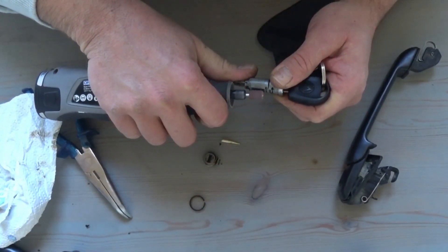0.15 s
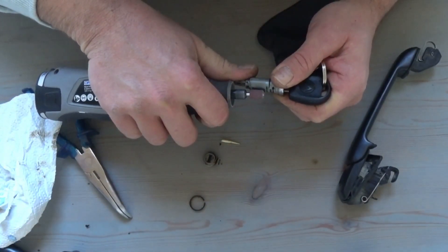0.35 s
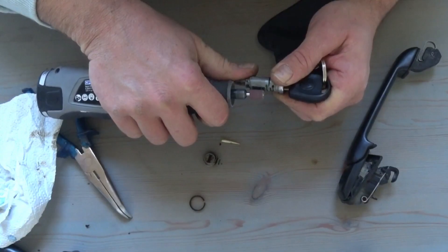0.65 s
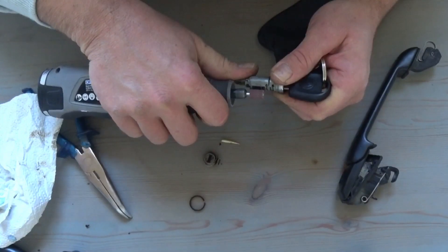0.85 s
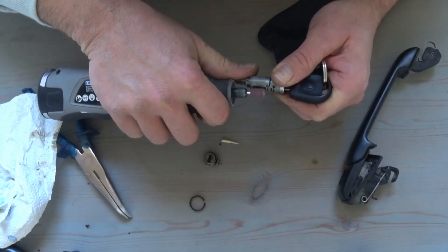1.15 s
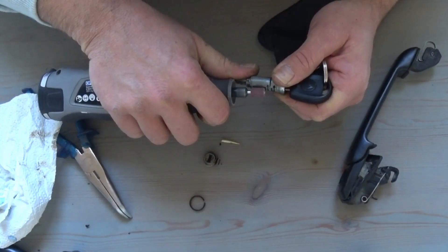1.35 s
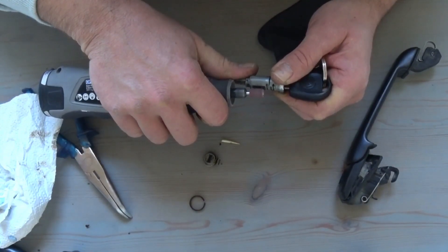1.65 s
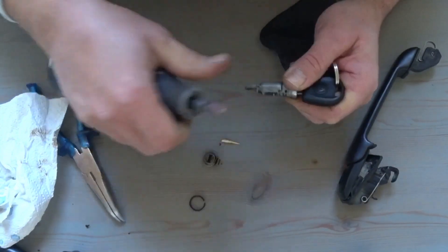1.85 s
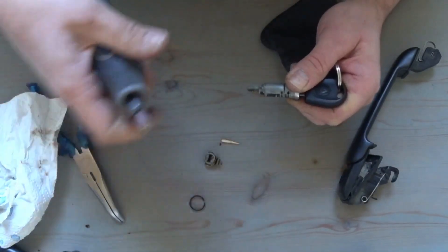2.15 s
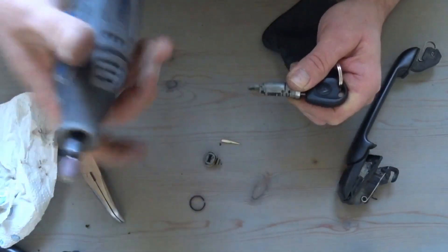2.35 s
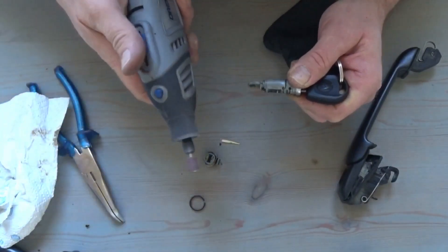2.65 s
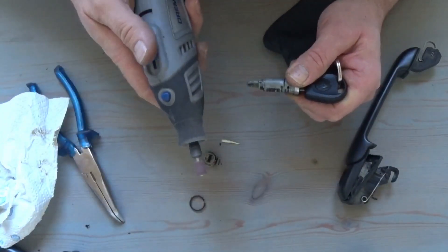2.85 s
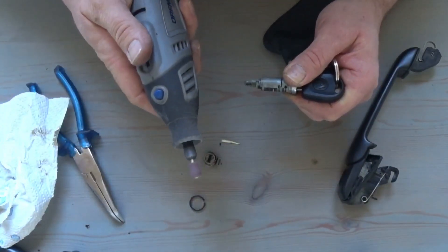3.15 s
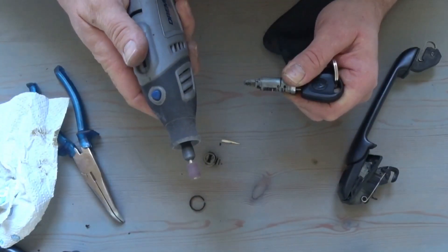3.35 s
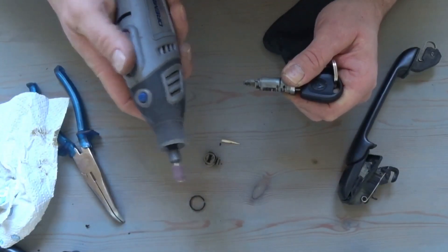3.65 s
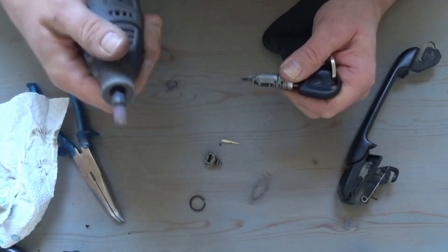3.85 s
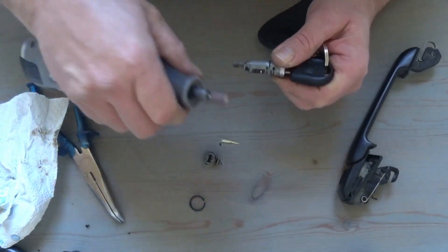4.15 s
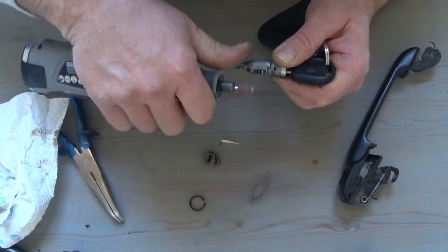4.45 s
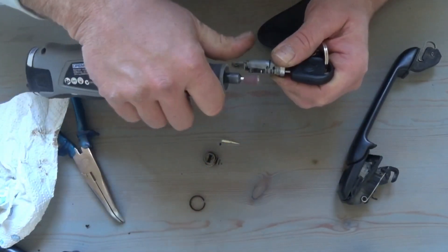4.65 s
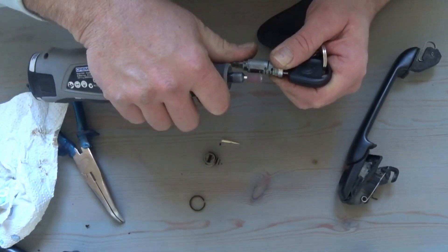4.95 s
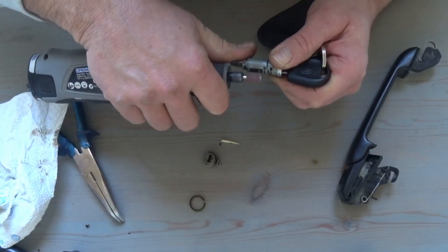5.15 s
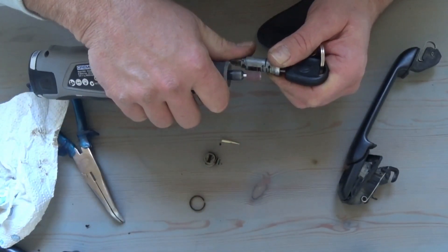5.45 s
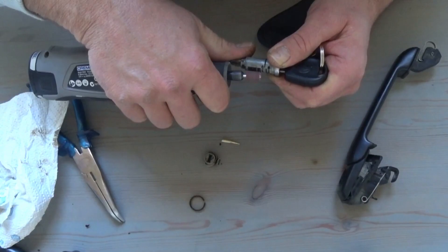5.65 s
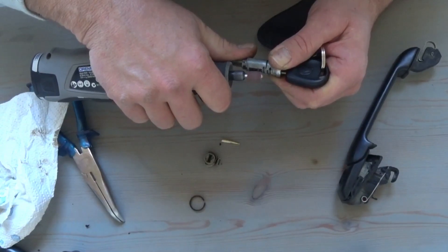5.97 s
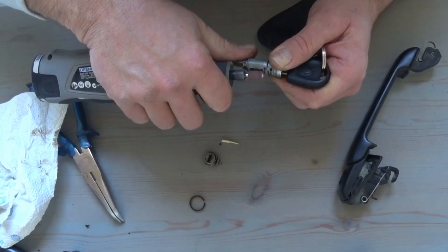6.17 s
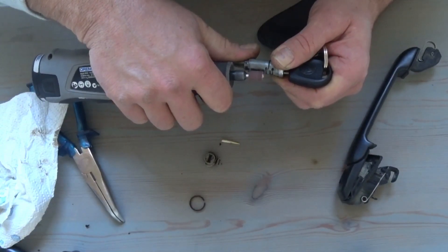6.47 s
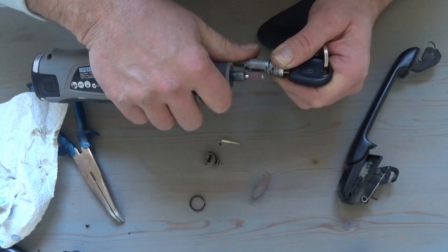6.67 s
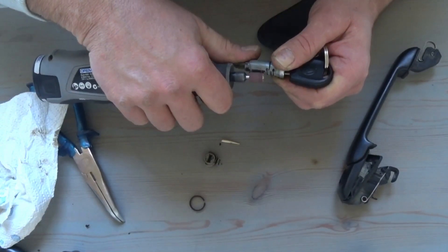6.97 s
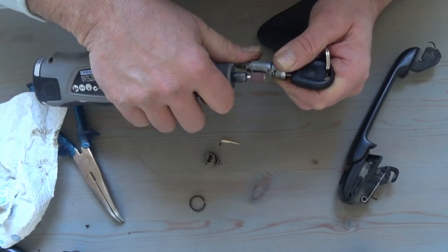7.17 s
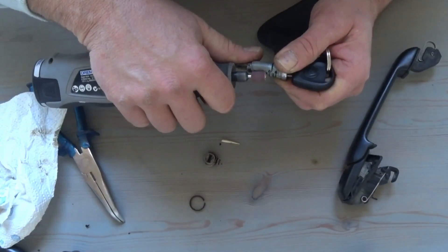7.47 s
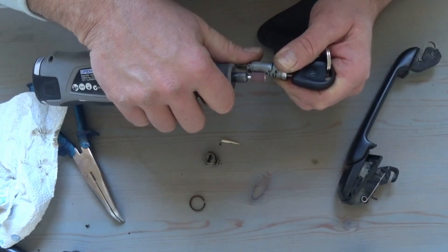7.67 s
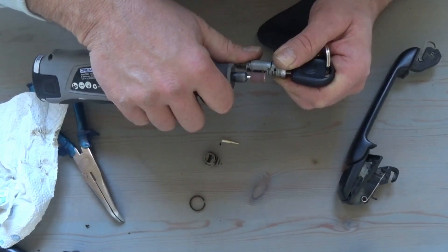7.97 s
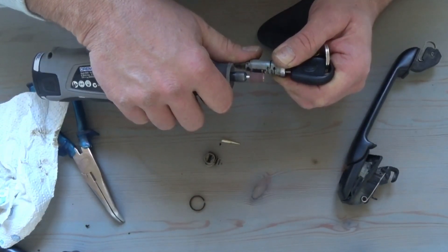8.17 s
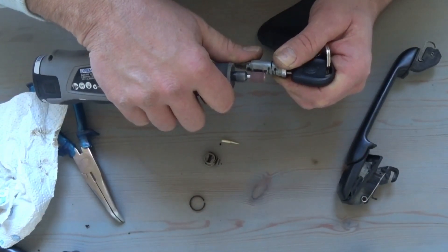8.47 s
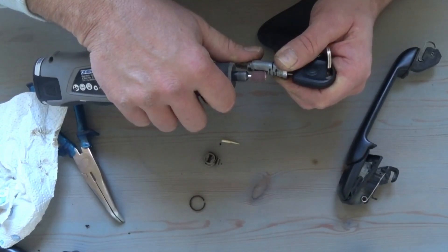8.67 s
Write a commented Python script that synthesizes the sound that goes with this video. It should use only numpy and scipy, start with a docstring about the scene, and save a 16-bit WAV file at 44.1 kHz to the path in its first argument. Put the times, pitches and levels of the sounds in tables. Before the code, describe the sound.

From the start a hand-held rotary tool grinds a small metal lock cylinder: a rough buzzing motor with brush and fan hiss, plus gritty scraping and chatter pulsing with each turn. After a brief easing at 0.3-0.45 s it presses again, the pitch sagging until about 1.5 s. The stone lets go, the motor recovers, and at 1.7-1.8 s a dull cluster of wooden knocks rattles the bench. The free-running buzz changes colour, with sliding resonances, as the tool swings. From 3.0 to 4.0 s it winds up to nearly double the pitch, then holds a bright, hissy whine. At 5.4 s the stone bites again; harsher scraping drags the pitch down by 5.9 s. It rebounds near 6.4 s, sags heavily to 7.3 s, jumps around 7.6 s, then grinds low again until a slight rise at 8.7 s. Close stereo, tool slightly left, short reflections and faint low room tone.

```python
"""A stone is heard grinding a small lock cylinder at once, its hand-held rotary tool slowing under the drag.
It is lifted off with a dull knock on the wooden bench, turned up to a higher speed, and bites again.
The motor is a repeating pattern of rotor lines plus brush and fan hiss, both following the shaft.
Grit scrapes most strongly once a turn and the bouncing stone chatters; both ring the lock.
Resonances flare and slide as the tool is swung about; a faint low room tone lies underneath."""
import sys
import numpy as np
from scipy import signal
from scipy.fft import rfft, irfft, next_fast_len
from scipy.io import wavfile
from scipy.ndimage import uniform_filter1d

SR = 44100
rng = np.random.default_rng(int(sys.argv[2]) if len(sys.argv) > 2 else 0)


def log_audio(samples):
    """Write samples as a 16-bit WAV file to the path given in sys.argv[1]."""
    # one column per channel
    frames = np.atleast_2d(samples).T
    # limit to full scale, then quantise
    limited = np.clip(frames, -1, 1)
    pcm = np.round(limited * 32767).astype(np.int16)
    wavfile.write(sys.argv[1], SR, pcm)


N = 388521
T = np.arange(N) / SR  # time of every sample, s

# Shaft speed before inertia smooths it: t/s, speed/Hz (turns per second)
SHAFT_SPEED = [(0.0, 85.5), (0.12, 75.5), (0.38, 70.0), (0.5, 70.25), (0.68, 64.75), (1.34, 54.75),
               (1.54, 56.75), (1.8, 79.75), (1.95, 85.5), (2.17, 86.5), (2.5, 88.5), (3.04, 90.0),
               (3.3, 124.0), (3.5, 140.5), (3.82, 153.25), (4.45, 157.3), (5.0, 155.5), (5.39, 156.2),
               (5.51, 146.0), (5.6, 131.7), (5.72, 110.2), (5.78, 105.8), (5.92, 103.0), (6.21, 107.9),
               (6.41, 130.7), (6.52, 127.5), (6.575, 121.8), (6.67, 99.7), (6.74, 96.0), (6.83, 87.0),
               (7.25, 83.5), (7.45, 112.0), (7.66, 122.0), (7.85, 102.5), (8.2, 82.5), (8.5, 80.5),
               (8.72, 97.25), (8.81, 97.75)]
# Strong multiples of the shaft speed: order, level/dB over the other orders on the slow setting, on the fast one
STRONG_ORDERS = [(1, 5, 6), (3, 3, 7), (4, 0, 10.5), (5, -5, -2), (6, 10.5, 12), (7, -4, 5.5), (8, 0, 9.5),
                 (9, 10.5, 13), (11, -1, -3), (12, 11, 11), (14, 6.5, 10), (15, 11, 2), (16, 11, 10),
                 (17, 2, 1.5), (18, 11.5, -1), (20, 11, 0), (22, 5, 7.5), (24, 1, 2), (25, 0, -6),
                 (27, 7, -6), (28, 1, 3)]
# Tone colour of the motor housing: f/Hz, level/dB
HOUSING_COLOUR = [(76, -68), (130, -23), (418, -20.5), (459, -15), (618, -14.5), (665, -12.5), (912, -4),
                  (1020, -7), (1270, -3.5), (1510, -7.5), (2480, -0.5), (4500, -4), (6170, -14.5),
                  (7560, -19.5), (11000, -23.5), (14200, -57), (22000, -120)]
# Tone colours of the scraped metal, slow setting then fast: f/Hz, level/dB
METAL_COLOURS = [
    [(76, -26), (130, -25), (273, -23.5), (335, -14.5), (653, -10), (816, -4.5), (1120, -8.5), (1370, -3),
     (2390, -20.5), (3100, -12), (3530, -17), (4000, -12), (4700, -14), (6280, -10.5), (7560, -0.5),
     (8940, -10), (11000, -5), (14200, -50), (22000, -120)],
    [(76, -50), (130, -21), (278, -22), (335, -13), (418, -14.5), (523, -10.5), (1120, -3), (1370, 2),
     (1710, -5.5), (2940, -5), (3740, -7.5), (7420, -8), (8940, -15), (10200, -10), (11000, -15),
     (14200, -64), (22000, -120)],
]
# Tone colour of the low rumble in the room: f/Hz, relative level/dB
ROOM_COLOUR = [(20, -6), (50, -1.5), (100, -4.5), (200, -10.5), (400, -13.5), (2000, -85)]
# Strength of the reflections that differ between the sides: f/Hz, level/dB
REFLECTION_COLOUR = [(100, -2), (280, 5.5), (600, -12), (1100, -10), (2200, -10), (3300, -14), (5500, -52),
                     (11000, -68)]
# How much louder the left side is than the right, before reflections: f/Hz, level/dB
LEFT_OVER_RIGHT = [(190, 0.5), (340, 2.9), (600, 1.1), (1060, 2.8), (1900, 4.2), (3300, 0.5), (5900, 0.65)]
# Resonances of tool and lock pressed together: f/Hz, width/Hz, level/dB
LOCK_MODES = [(151.5, 12, 8), (330, 25, -4.5), (402, 40, -4), (515.6, 22.6, 8), (580, 31, 3), (717, 48, 0),
              (823, 74, 4), (948, 21, 2), (1047, 18, 2), (1194, 22, 5), (1256, 35, -1), (1360, 15, 4),
              (1460, 28, -1.5), (1610, 19, 1.5), (2207, 170, -0.5), (2500, 270, -5.5), (2750, 120, -9.5),
              (2890, 36, 0), (2988, 30, 1.5), (3330, 220, -3.5), (4050, 230, -5.5), (4370, 170, -7),
              (5600, 490, -15.5), (7660, 710, -11), (9860, 870, -2.5)]
# Knocks through the bench: t/s, time for which the push is above a fifth of its peak/ms,
# boom level/dB, sideways rocking level/dB
BENCH_KNOCKS = [(1.6759, 1, -24, -10), (1.6838, 2.2, -16.5, -2), (1.7035, 1.8, -28, -28),
                (1.7171, 2.2, -25.5, -8), (1.7315, 2.7, -31, -30), (1.744, 3.8, -24, -18),
                (1.7673, 2.7, -39, -22), (1.8038, 1.4, -41, -6), (1.8116, 1.3, -29.5, -16),
                (1.8178, 3.6, -24, -16)]
# Resonances that flare as the tool turns in the hand: t/s, time from peak to 37 %/s, f/Hz,
# glide/octaves per s, width/Hz, peak level/dB
TOOL_FLARES = [(1.873, 0.045, 1490, 0.3, 60, 8), (1.958, 0.027, 2780, 0, 510, 10),
               (2.137, 0.075, 513, 0.27, 46, 18), (2.17, 0.027, 3150, -1, 350, 9.5),
               (2.223, 0.024, 7100, 0, 800, 9), (2.254, 0.076, 4660, -0.61, 360, 11.5),
               (2.27, 0.06, 5700, 0.8, 700, 7), (2.294, 0.055, 2270, -1, 200, 10.5),
               (2.7, 0.065, 2240, 0.48, 110, 16), (2.723, 0.11, 4250, -0.5, 350, 8),
               (2.867, 0.23, 1360, -0.024, 60, 6.5), (3.08, 0.074, 1440, 0.82, 80, 10),
               (3.219, 0.088, 930, 0.74, 90, 1), (3.494, 0.23, 1270, 0.91, 200, 6.5),
               (3.607, 0.11, 580, 0.19, 50, 9.5), (3.55, 0.25, 1750, 0.023, 300, 4),
               (3.68, 0.076, 2077, -1.4, 240, 8.5), (3.63, 0.074, 5000, 0.26, 500, 6),
               (3.79, 0.055, 5680, -0.34, 400, 10), (3.852, 0.03, 4700, 0.12, 300, 13),
               (3.96, 0.053, 3737, -1.4, 300, 6.5), (3.994, 0.044, 5260, 0.45, 600, 5.5),
               (4.12, 0.026, 3480, -0.62, 220, 9), (4.46, 0.14, 3455, -0.022, 260, 2)]
# Resonances of the motor housing: f/Hz, width/Hz, level/dB
HOUSING_MODES = [(580, 19, -1), (801.5, 9.2, 5), (930, 16, -4), (1046, 25, 0.5), (1240, 19, 3),
                 (1339, 6.6, 4.5), (1592, 69, -2.5), (1770, 44, -6.5), (1940, 97, -3.5), (2200, 32, 0),
                 (2454, 150, -8), (3020, 90, -11), (3240, 700, -3.5), (7400, 640, 4), (10400, 113, 10)]
# Resonances of the hollow under the cupped palm: f/Hz, width/Hz, level/dB
PALM_MODES = [(2593, 120, 1), (3400, 280, -6), (4450, 140, -12)]
# Bench modes, alike on both sides: f/Hz, level/dB before the push softens them, time to fall 60 dB/s
BOOM_MODES = [(55, -8, 0.13), (136, -6, 0.063), (170, -5, 0.17), (228, -3.5, 0.13), (253.7, -7, 0.36),
              (304, -3, 0.12), (417, -5, 0.089), (510, -9, 0.07), (630, -9, 0.044), (750, -14, 0.035),
              (960, -1, 0.055), (1280, -5, 0.05)]
# Modes that rock the microphone, opposite on the two sides: columns as for the boom
ROCKING_MODES = [(200, -10, 0.1), (232, -9, 0.15), (330, -2, 0.11), (378, -10, .07), (484, -15, .06),
                 (615, -9, 0.078), (668, -11, 0.055)]
# Presses of the stone on the metal: start t/s, end t/s, time to fade to 37 %/s, level/dB without drag,
# extra level/dB at the first bite, low part/dB and top/dB against the middle (low without drag),
# chatter weight/dB against the grit
STONE_PRESSES = [(0.0, 0.305, 0.42, -37.5, 2.5, -5.5, -8.5, -12),
                 (0.448, 1.536, 0.056, -37, 3, -6.5, -10, -14), (5.364, 6.172, 0.13, -34.5, 2, -10, -4, -1),
                 (6.305, 6.378, 0.089, -36.5, -5.5, -8, -5.5, -1),
                 (6.408, 7.282, 0.18, -31.5, -2, -10, -4.5, -3),
                 (7.458, 7.618, 0.063, -33.5, -0.5, -13.5, -4.5, -9),
                 (7.668, 8.812, 0.047, -34, 5, -10, -6, -15.5)]
# Catches of the stone that make the lock sing out: columns as for the tool flares
LOCK_SQUEALS = [(0.1, 0.02, 7400, 0, 2500, 3), (5.41, 0.042, 2335, 0.42, 160, 5.5),
                (5.5, 0.15, 145, -0.8, 25, 5), (5.58, 0.045, 1290, -1.5, 200, 9.5),
                (5.535, 0.09, 2820, -0.53, 90, 8), (5.79, 0.049, 1280, 0.12, 159, 9),
                (5.93, 0.018, 2240, 0, 250, 9.5), (6.063, 0.026, 760, 0.33, 200, 8),
                (6.47, 0.081, 523, -0.31, 35, 1), (6.608, 0.045, 680, -2, 250, 6.5),
                (6.85, 0.032, 2270, 0.12, 250, 5.5), (7.625, 0.022, 1280, -0.14, 70, 16.5),
                (7.708, 0.03, 3000, 0, 1800, 1.5), (7.817, 0.023, 1370, 0, 80, 4.5),
                (8.25, 0.06, 1360, 0, 70, 4.5), (7.102, 0.4, 330, 0.3, 29.5, 9),
                (8.28, 0.26, 500, -0.36, 160, 6), (8.56, 0.017, 1380, -0.12, 100, 11.5)]
# The tool swung over the bench: t/s, height of the vents/m, gain of the bench echo
TOOL_SWING = [(1.7, 0.059, 0), (1.88, 0.13, 0.1), (2.08, 0.1666, 0.1), (2.3, 0.16, 0), (2.55, 0.095, 0.07),
              (3.0, 0.075, 0.1), (3.45, 0.11, 0), (3.7, 0.15, 0), (3.97, 0.21, 0.02), (4.4, 0.1, 0),
              (4.6, 0.076, 0)]

# Holds: motor level/dB, low part/dB against the middle (both at SLOW_HZ), top/dB against the middle,
# palm resonance (0 none, 1 full, below 0 opposite)
OVERHAND = (-40.5, -3, -6.5, 0.5)  # the palm covers the vents
NOSE_UP = (-43, -5, -2, 0)  # pointing at the microphone
HALF_UP = (-39.5, -3, -3.5, 0)  # tilted half way down again
DIAL_UP = (-42.5, -2.8, -3, -0.5)  # held loosely by the body, vents open
# Moves from one hold to the next: t/s, length of the move/s, new hold
HOLD_MOVES = [(1.84, 0.071, NOSE_UP), (2.2, 0.29, HALF_UP), (2.55, 0.26, DIAL_UP), (3.72, 0.094, NOSE_UP),
              (4.02, 0.47, OVERHAND)]

SLOW_HZ, FAST_HZ = 89, 157  # free shaft speed on the two dial settings
TURNED_UP_S, DIAL_TURN_S = 3.03, 0.13  # when the dial is turned up, and for how long
INERTIA_S = 0.06  # shaft speed is averaged over this time
# unsteadiness, in turns: the rotor on each setting; slow waver and quick jitter of the strikes
SHAKE_SLOW, SHAKE_FAST, WAVER, JITTER = 0.0008, 0.0045, 0.007, 0.0013
MOTOR_DB_PER_OCTAVE, MOTOR_LOW_DB_PER_OCTAVE = 7, -2.5  # a faster motor is louder and thinner
ATTACK_S, BITE_S = 0.04, 0.3  # the stone meets the metal; the first bite wears off to 37 %
# drag is how many octaves the stone pulls the shaft below its free speed
SCRAPE_DB_PER_DRAG, SCRAPE_LOW_DB_PER_DRAG = 2.5, 7
# drag at which the stone stops bouncing, range over which it does so, chatter weight then left
SEATED_DRAG, SEATING_DRAG, SEATED_CHATTER_DB = 0.8, 0.25, -14
SOUND_M_S = 343  # speed of sound
TOP_HZ = 11050  # upper edge of the sound


def undb(db):
    """Turn decibels into a gain."""
    return 10 ** (np.asarray(db) / 20)


def unit(x):
    """Scale to an average (rms) strength of 1."""
    return x / np.sqrt(np.mean(x ** 2))


def ramp(x):
    """Rise from 0 to 1 and stay there."""
    return np.clip(x, 0, 1)


def curves(table):
    """Join the columns of a table by straight lines in time."""
    s, *columns = np.transpose(table)
    return [np.interp(T, s, column) for column in columns]


def walk(rate):
    """Drift smoothly by chance, with spread near 1; a higher rate drifts faster."""
    k = max(int(SR / rate), 1)
    steps = np.repeat(rng.standard_normal(N // k + 1), k)[:N]
    return 1.277 * uniform_filter1d(uniform_filter1d(steps, k), k)


def shape(x, response):
    """Filter by a function of frequency."""
    size = next_fast_len(N + 8192, True)
    hz = np.fft.rfftfreq(size, 1 / SR) + 1e-6  # never exactly zero
    return irfft(rfft(x, size) * response(hz), size)[:N]


def colour(x, points):
    """Filter by a line drawn through (f/Hz, level/dB) points."""
    hz, db = np.transpose(points)
    return shape(x, lambda f: undb(np.interp(np.log(f), np.log(hz), db)))


def resonate(x, modes):
    """Add resonances, each ringing longer the narrower it is."""
    def response(f):
        return 1 + sum(undb(db) / (1 + 1j * (f / hz - hz / f) * hz / width) for hz, width, db in modes)
    return shape(x, response)


def scatter(x, t60):
    """Make a dense, fading cloud of reflections with about the energy of the sound itself."""
    t = T[:SR // 4]
    echoes = rng.standard_normal(len(t)) * undb(-60 * t / max(t60, .002))
    return signal.oaconvolve(x, echoes / np.linalg.norm(echoes))[:N]


def flare(x, swells):
    """Let single resonances swell, slide and fade."""
    out = x.copy()
    for s, length, hz, glide, width, db in swells:
        near = abs(T - s) < 2 * length
        age = T[near] - s
        # shift the sliding band down to zero, smooth it there, and shift it back
        carrier = np.exp(2j * np.pi * np.cumsum(hz * 2 ** (glide * age)) / SR)
        pole = np.exp(-np.pi * width / SR)
        band = 2 * np.real(carrier * signal.lfilter([1 - pole], [1, -pole], x[near] / carrier))
        out[near] += (undb(db) - 1) * np.exp(-(age / length) ** 2) * band
    return out


def ripple(x, angle, db, t60, count=3):
    """Add the many close upper modes of a small body; their pattern changes with the angle."""
    turning = (np.cos(angle * np.sqrt(k + 1) + k) * scatter(x, t60) for k in range(count))
    cloud = sum(turning) * np.sqrt(2 / count)
    # the modes answer a millisecond after the direct sound
    return x + undb(db) * colour(np.roll(cloud, SR // 1000), [(900, -25.5), (2500, 2.5)])


def radiate(x, level_db, low_db, top_db):
    """Set the level of the middle band, with the low part and the top relative to it."""
    def below(f, hz):
        return 1 / (1 + (f / hz) ** 8)
    low = shape(x, lambda f: below(f, 1800))
    top = shape(x, lambda f: 1 - below(f, 5000))
    middle = unit(x - low - top)
    return undb(level_db) * (middle + undb(low_db) * unit(low) + undb(top_db) * unit(top))


def pressing(presses):
    """Contact gain, low part, top and chatter of the stone: each press bites, settles and lets go."""
    contact, tone = 0, np.zeros((3, N))
    for start, end, release, level_db, bite_db, *tone_db in presses:
        age = np.maximum(T - start, 0)
        envelope = ramp(age / ATTACK_S) * np.exp(-np.maximum(T - end, 0) / release)
        contact = np.maximum(contact, envelope * undb(level_db + bite_db * np.exp(-age / BITE_S)))
        tone[:, np.searchsorted(T, start):] = np.array(tone_db)[:, None]
    return (contact, *tone)


def bouncing(turns, uneven_db=1.5, ring_db=7, ring_t60=0.079):
    """The stone strikes once a turn, never quite on time, and each strike rings the lock's close modes."""
    turn = np.floor(turns + WAVER * walk(30) + JITTER * walk(200))
    strikes = np.diff(turn, prepend=turn[0]) * undb(uneven_db * rng.standard_normal(N))
    ringing = strikes + undb(ring_db) * scatter(strikes, ring_t60)
    tone = [(150, -2), (280, -2.5), (500, 4.5), (1000, 2.0), (1400, 0.0), (2300, 1.5), (3300, -5), (6000, -18)]
    return unit(colour(ringing, tone))


def wander(x, spread_db=1.15, rate=40, count=5):
    """The point of contact shifts, so that each band flares up and sinks on its own."""
    out = x
    for hz in np.geomspace(700, 4300, count):
        band = signal.lfilter(*signal.iirpeak(hz, 4, SR), x)
        out = out + (undb(spread_db * walk(rate)) - 1) * band
    return out


def grinding(turns, drag, presses, spectrum, grit_db, runout, turn_db=1.0):
    """Grit tears at the metal, hardest when the high side of the stone comes round; the lock rings with it."""
    contact, low_db, top_db, bounce_db = pressing(presses)
    loose = ramp((SEATED_DRAG - drag) / SEATING_DRAG)
    chatter_db = SEATED_CHATTER_DB + loose * (bounce_db - SEATED_CHATTER_DB)
    # the high side bites suddenly and lets go gradually
    lobe = np.exp(-runout * ((turns + 0.06 * walk(30)) % 1))
    # every half turn bites a little differently
    bite = undb(turn_db * rng.standard_normal(4096))[(2 * turns).astype(int)]
    # about 9000 grains a second, of chance direction and strength
    strength = undb(grit_db * np.minimum(rng.exponential(size=N), 6))
    grains = (rng.random(N) < 9000 / SR) * rng.choice([-1, 1], N) * strength
    chatter = bouncing(turns)
    scrape = unit(grains * lobe * bite)
    # while the stone bounces, the body of the scrape goes into the chatter
    body = colour(scrape, [(2500, 0.5), (4500, -39)])
    share = undb(chatter_db) ** 2 / (1 + undb(chatter_db) ** 2)
    force = scrape - 0.75 * share * body + 0.7 * np.sqrt(share) * chatter
    force = wander(force * undb(0.37 * walk(45)))
    force = ripple(force, 0.9 * walk(4) + 0.8 * T, db=-12.0, t60=0.074)
    ringing = flare(resonate(force, LOCK_MODES), LOCK_SQUEALS)
    # more drag makes the scrape louder and fuller
    level_db = SCRAPE_DB_PER_DRAG * drag
    low_db = low_db + SCRAPE_LOW_DB_PER_DRAG * drag
    return contact * radiate(colour(ringing, spectrum), level_db, low_db, top_db)


def rotor(turns, boosts, half_db, treble_db, size=16384, count=260):
    """A pattern that repeats every second turn: whole orders, and weaker half orders from bearing play."""
    order = np.arange(1, count) / 2
    db = np.where(order % 1 == 0, 0, half_db) + 1.9 * rng.standard_normal(count - 1)
    db = db + treble_db * np.log2(np.maximum(order / 20, 1))  # tilt per octave above order 20
    for k, boost_db in boosts:
        db[np.argmin(abs(order - round(k)))] = boost_db
    phases = np.exp(2j * np.pi * rng.random(count - 1))
    cycle = irfft(np.r_[0, undb(db) * phases], size)
    return unit(np.interp(turns / 2 % 1 * size, np.arange(size), cycle))


def holding():
    """Level, low part, top and palm share of the motor as the hand moves from hold to hold."""
    tone = np.array(OVERHAND)[:, None]
    for s, length, hold in HOLD_MOVES:
        tone = tone + ramp((T - s) / length) * (np.array(hold)[:, None] - tone)
    return tone


def motor(turns, hz, hiss_db=3.5, fast_hiss_db=0.96, flutter=0.28, swish=0.24, cage_db=-4.5, sway_db=-6,
          stir_per_m=45):
    """Rotor and bearing lines, with brush and fan hiss that pulses each turn, coloured by the housing."""
    angle = 2 * np.pi * turns
    pulsing = np.exp(flutter * np.cos(angle) + swish * np.cos(2 * angle) + 0.044 * np.cos(angle / 2))
    hiss = unit(pulsing * rng.standard_normal(N)) * undb(.5 * walk(25.06))
    pace = ramp((T - TURNED_UP_S) / DIAL_TURN_S)  # 0 slow setting, 1 fast
    # the rotor shakes in its bearings by a fraction of a turn, which frays the upper lines into a buzz
    shaken = turns + (SHAKE_SLOW + (SHAKE_FAST - SHAKE_SLOW) * pace) * walk(260)
    orders = np.array(STRONG_ORDERS)
    slow = rotor(shaken, orders[:, [0, 1]], half_db=-3.5, treble_db=0.0)
    fast = rotor(shaken, orders[:, [0, 2]], half_db=-3.5, treble_db=0.0)
    lines = (np.sqrt(1 - pace) * slow + np.sqrt(pace) * fast) * undb(1.23 * walk(12))
    # the hand is never still: a second, drifting pattern lifts some lines and weakens others
    lines = lines + undb(sway_db) * walk(5) * rotor(shaken, [], half_db=-9, treble_db=-3.0)
    # the ball cage lags the shaft and fills the gaps with finer lines
    cage = rotor(.39 * shaken + 0.0041 * walk(40), [], half_db=-3.5, treble_db=-0.5)
    height, echo = curves(TOOL_SWING)
    travel = np.cumsum(abs(np.gradient(height)))  # metres moved so far
    sound = lines + undb(cage_db) * cage + undb(hiss_db + fast_hiss_db * pace) * hiss
    sound = ripple(sound, stir_per_m * travel + 1.156 * T, db=-8.0, t60=0.064)
    # the echo off the bench combs the sound; its teeth sweep as the tool rises and sinks
    sound = sound + echo * np.interp(T - 2 * height / SOUND_M_S, T, sound)
    level_db, low_db, top_db, cupped = holding()
    sound = sound + cupped * (resonate(sound, PALM_MODES) - sound)
    sound = flare(colour(resonate(sound, HOUSING_MODES), HOUSING_COLOUR), TOOL_FLARES)
    octaves = np.log2(hz / SLOW_HZ)
    level_db = level_db + MOTOR_DB_PER_OCTAVE * octaves
    low_db = low_db + MOTOR_LOW_DB_PER_OCTAVE * octaves
    return radiate(sound, level_db, low_db, top_db)


def workshop(x):
    """The tool sits slightly left; short reflections off bench and walls make the two sides differ."""
    side = colour(scatter(x, t60=0.3), REFLECTION_COLOUR)
    left = colour(x, [(hz, db / 2) for hz, db in LEFT_OVER_RIGHT])
    right = colour(x, [(hz, -db / 2) for hz, db in LEFT_OVER_RIGHT])
    return np.array([left + side, right - side])


def room_tone(level_db=-65, side_db=-11):
    """A faint low rumble of coloured noise, nearly alike on both sides."""
    mid = unit(colour(rng.standard_normal(N), ROOM_COLOUR))
    side = unit(colour(rng.standard_normal(N), ROOM_COLOUR))
    return undb(level_db + walk(4)) * (mid + undb(side_db) * np.array([side, -side]))


def knocks(rattle_db=8.5, rattle_t60=0.55, rattle_from_hz=230):
    """Soft blows ring the low modes of the bench and rock the microphone; loose things shiver briefly."""
    t = T[:SR // 2]

    def above(x, hz):
        return signal.sosfilt(signal.butter(2, hz, "high", fs=SR, output="sos"), x)

    def ring_modes(modes):
        return sum(undb(db - 60 * t / t60) * np.cos(2 * np.pi * hz * t) for hz, db, t60 in modes)

    boom = ring_modes(BOOM_MODES)
    rock = above(ring_modes(ROCKING_MODES), 130)  # the deep bass stays in the middle
    shiver = undb(rattle_db - 60 * t / rattle_t60) * rng.standard_normal((2, len(t)))
    rattle = above(shiver, rattle_from_hz)
    out = 0
    for s, ms, boom_db, rock_db in BENCH_KNOCKS:
        push = np.exp(-2 * np.pi * ((T - s) * 1000 / ms) ** 2)
        ring = undb(boom_db) * (boom + rattle) + undb(rock_db) * np.array([-rock, rock])
        out = out + signal.fftconvolve(ring, push[None] / push.sum(), axes=1)[:, :N]
    # the microphone picks up little deep bass from the knocks
    return above(out, 78)


def scene():
    """One shaft drives the motor and the stone, first on the slow setting and then on the fast one."""
    hz = uniform_filter1d(curves(SHAFT_SPEED)[0], int(INERTIA_S * SR))
    unsteady = 1 + 0.001012 * walk(20) + 0.00197 * walk(200)
    turns = np.cumsum(hz * unsteady) / SR
    drag = np.log2(np.where(T < TURNED_UP_S, SLOW_HZ, FAST_HZ) / hz)
    slow = [press for press in STONE_PRESSES if press[0] < TURNED_UP_S]
    fast = [press for press in STONE_PRESSES if press[0] >= TURNED_UP_S]
    light = grinding(turns, drag, slow, METAL_COLOURS[0], grit_db=2.0, runout=0.98)
    hard = grinding(turns, drag, fast, METAL_COLOURS[1], grit_db=2.0, runout=0.77)
    return workshop(motor(turns, hz) + light + hard) + room_tone() + knocks()


def record(dry):
    """Cut the treble steeply above TOP_HZ, without shifting anything in time."""
    return signal.sosfiltfilt(signal.ellip(12, .05, 60, TOP_HZ, fs=SR, output="sos"), dry)


dry = scene()
out = record(dry)
log_audio(out)
```